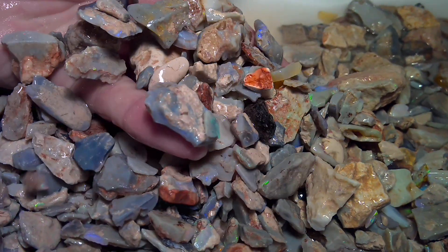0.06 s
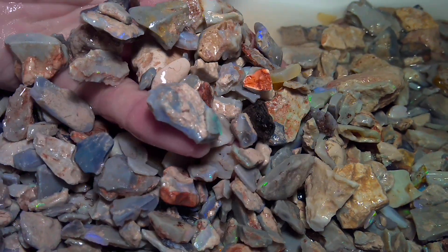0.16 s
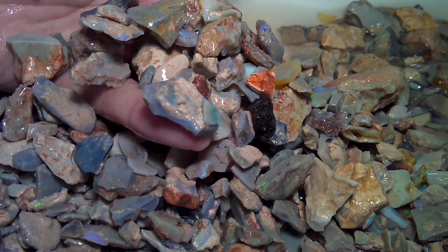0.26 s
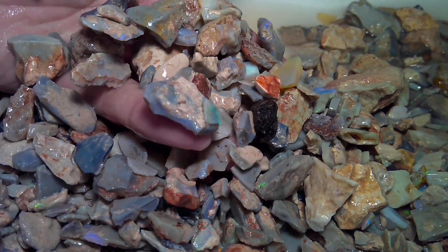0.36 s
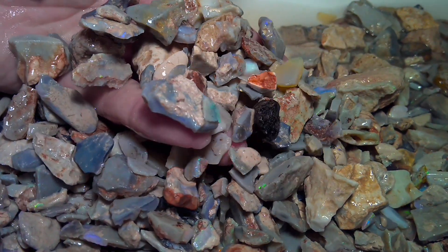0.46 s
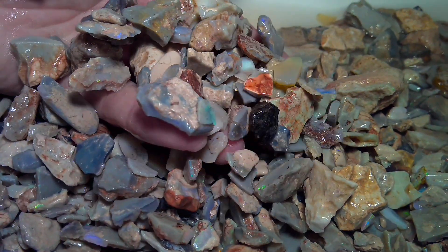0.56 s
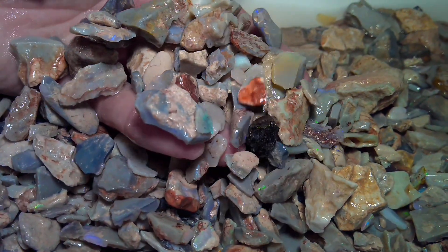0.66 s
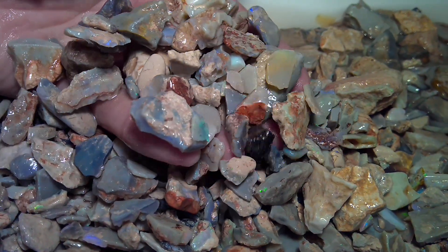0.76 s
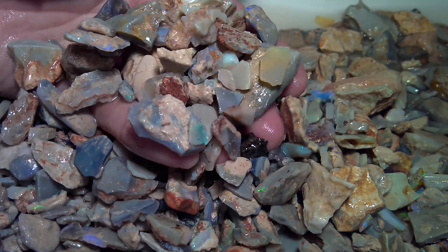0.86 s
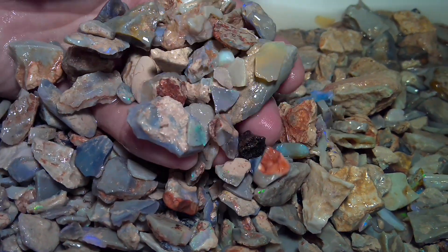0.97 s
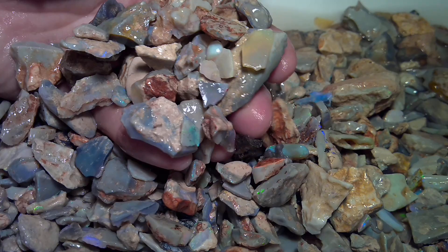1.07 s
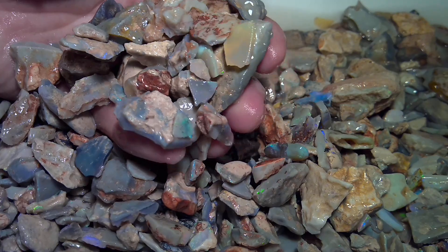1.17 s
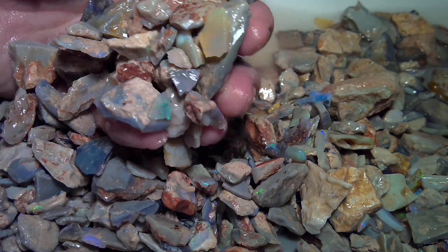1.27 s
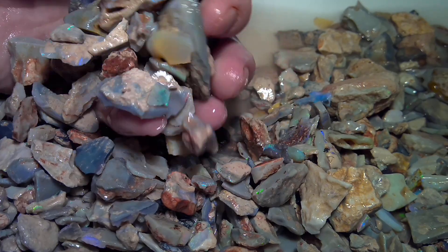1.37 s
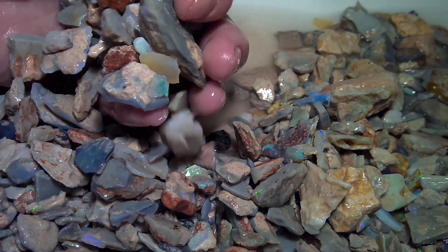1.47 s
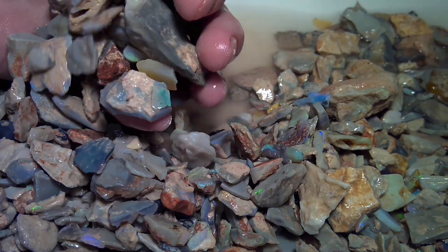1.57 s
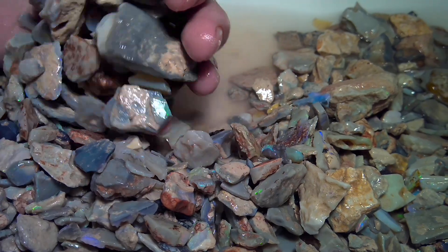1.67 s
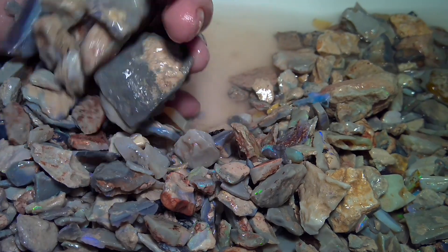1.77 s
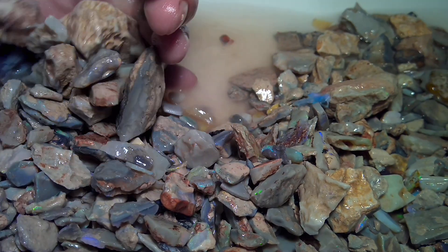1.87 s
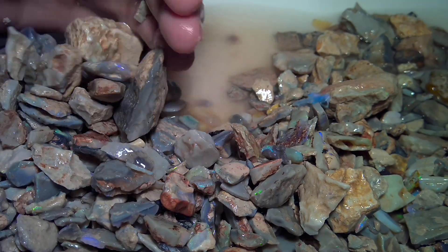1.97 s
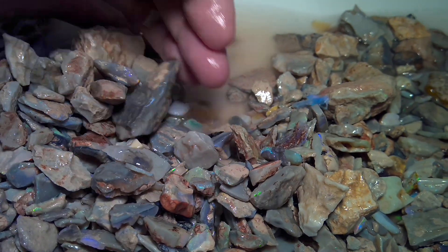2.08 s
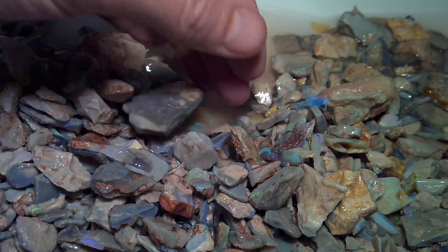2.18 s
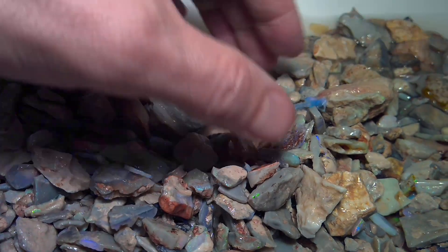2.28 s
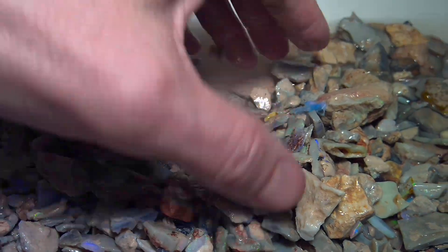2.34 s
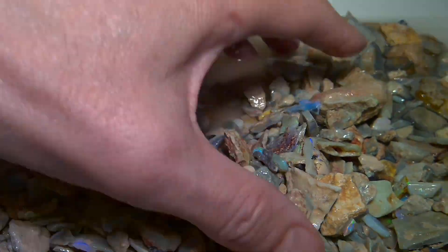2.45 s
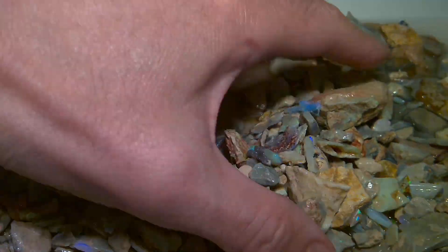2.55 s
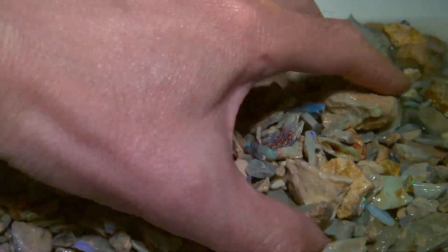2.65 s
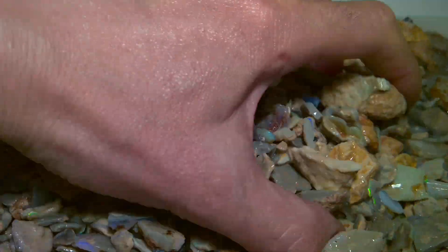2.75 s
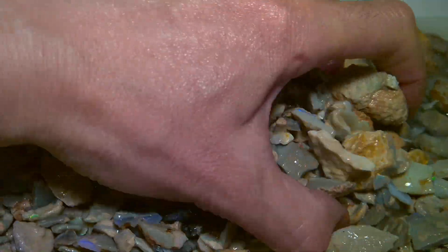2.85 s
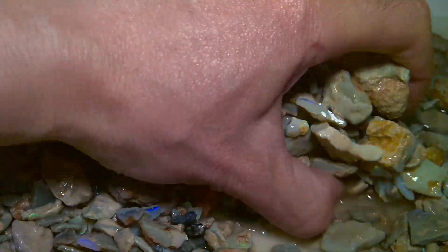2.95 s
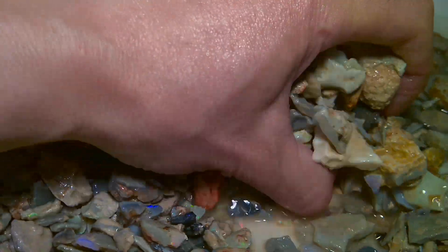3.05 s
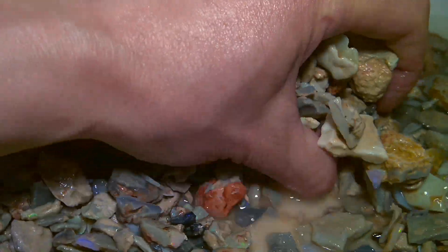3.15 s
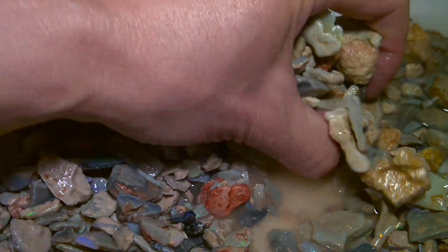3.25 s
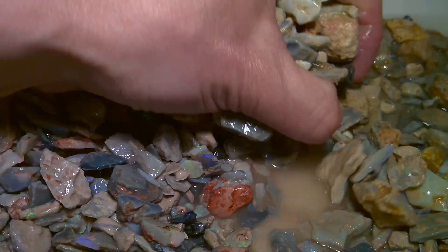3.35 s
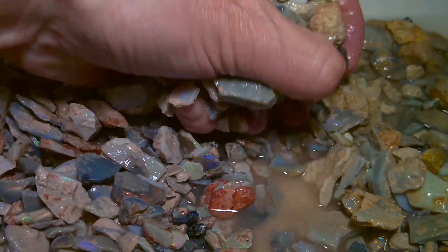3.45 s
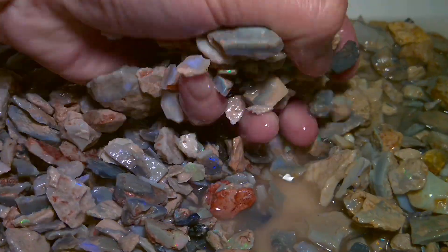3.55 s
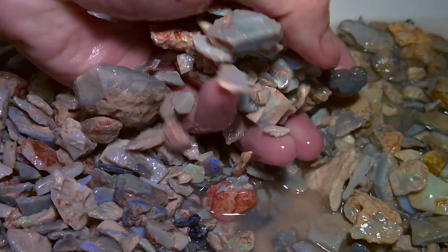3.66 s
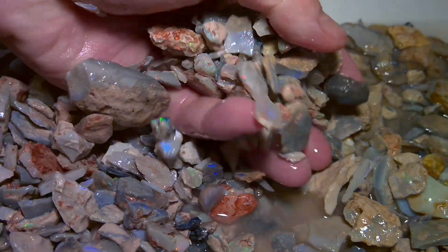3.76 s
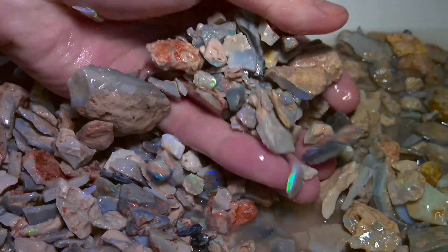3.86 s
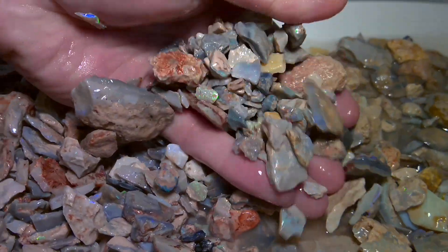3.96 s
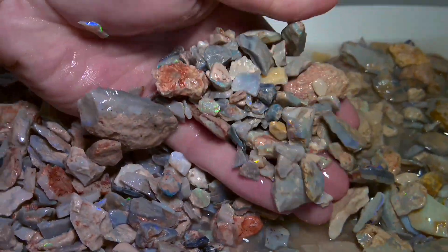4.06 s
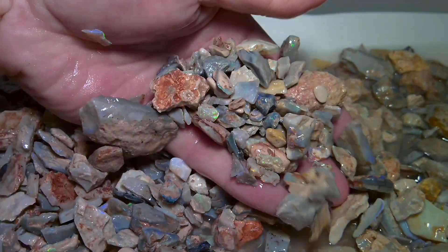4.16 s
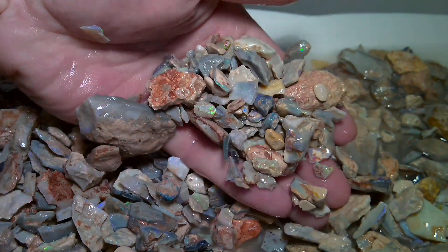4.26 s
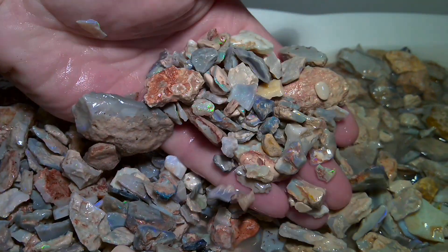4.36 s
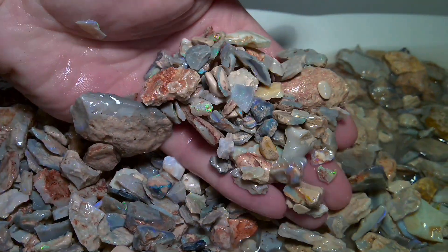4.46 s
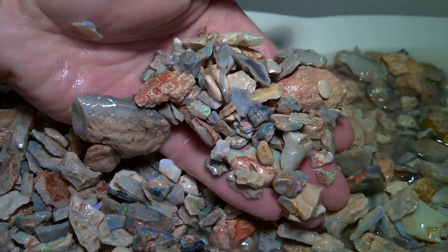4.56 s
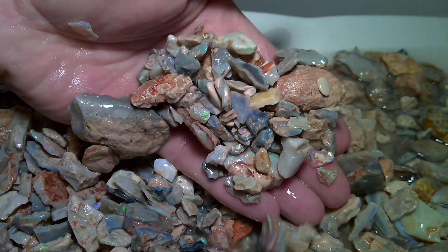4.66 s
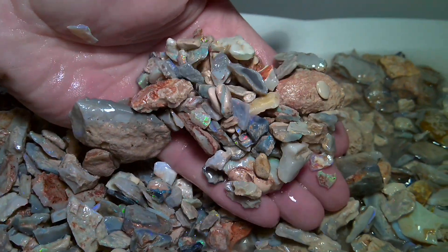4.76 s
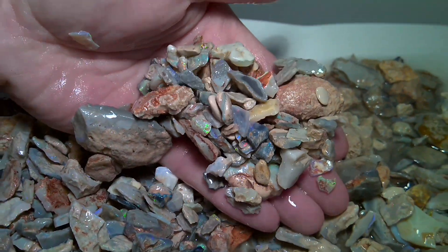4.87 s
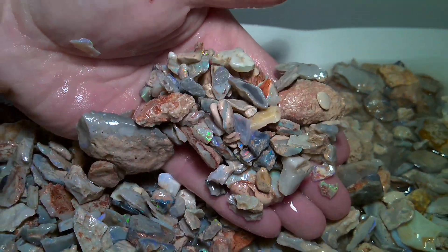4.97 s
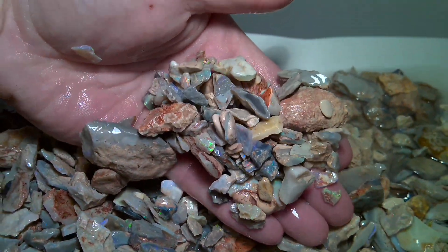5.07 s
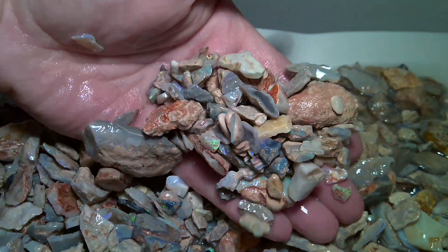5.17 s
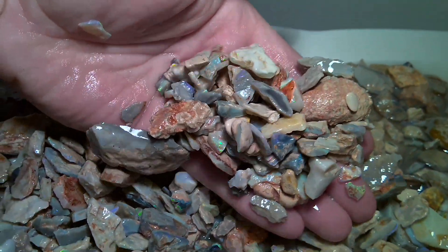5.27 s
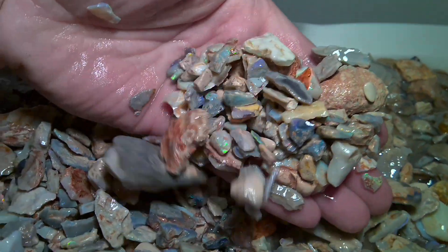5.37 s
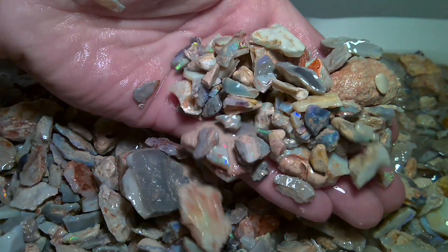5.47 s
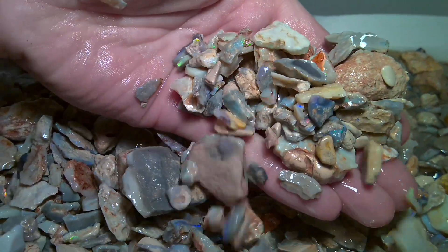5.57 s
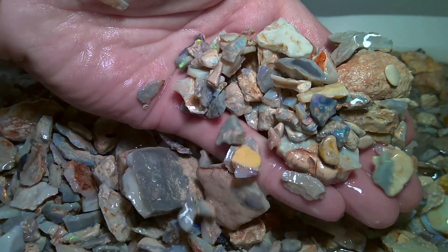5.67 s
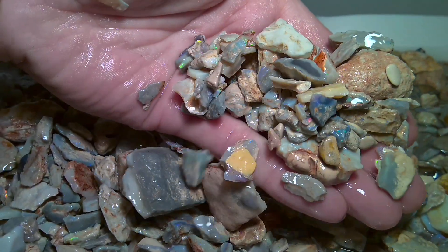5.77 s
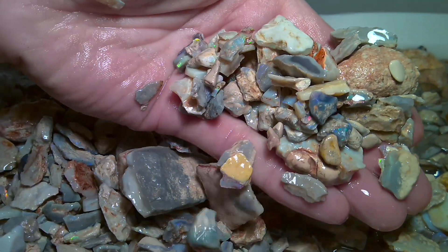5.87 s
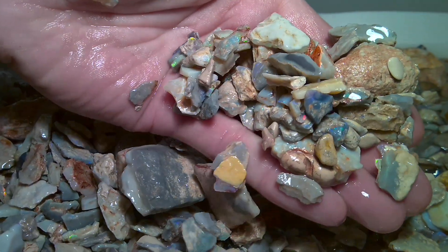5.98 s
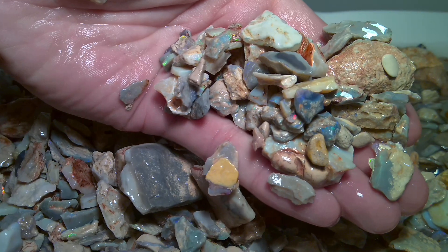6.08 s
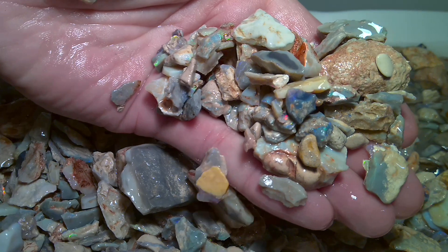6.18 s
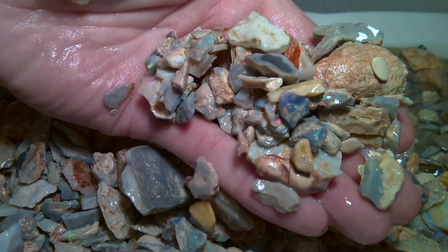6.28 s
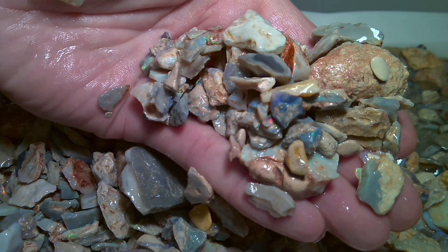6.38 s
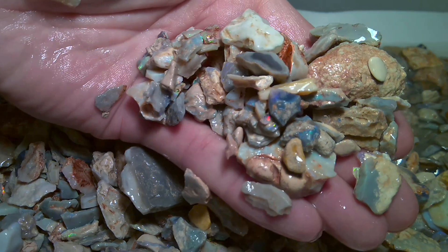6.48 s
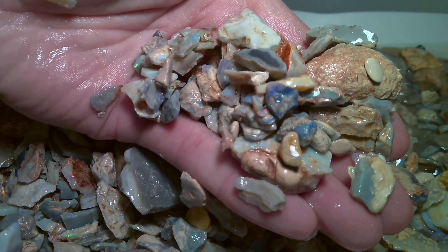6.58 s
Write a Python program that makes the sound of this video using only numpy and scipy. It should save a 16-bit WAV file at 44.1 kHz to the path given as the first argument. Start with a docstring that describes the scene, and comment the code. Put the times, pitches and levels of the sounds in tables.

```python
"""A low hum runs throughout, held down by the recorder's noise suppressor whenever the stones are quiet: a sine
over faint air. A hand scoops small wet stones in a plastic tub and lets them slide back onto the pile, close
to the microphone. The shifting heap is many random contacts, levelled in five bands. Over it single stones
clink and thud as noise bursts through resonances, and large stones ring as decaying sines. The tub rings in
a small room."""
import sys
import numpy as np
from scipy import signal
from scipy.fft import rfft, irfft, next_fast_len
from scipy.io import wavfile
from scipy.ndimage import uniform_filter1d

SR = 44100
rng = np.random.default_rng(int(sys.argv[2]) if len(sys.argv) > 2 else 0)


def output_pcm(signal):
    """Save a mono or channel-first signal as 16-bit PCM at the path in sys.argv[1].

    Samples are clipped to [-1, 1] before scaling.
    """
    pcm = np.clip(np.atleast_2d(signal).T, -1, 1) * 32767
    wavfile.write(sys.argv[1], SR, np.round(pcm).astype(np.int16))


N = 292383


def amp(db):
    """Decibels to gain."""
    return 10 ** (np.asarray(db) / 20)


def rms(x):
    """Root mean square."""
    return np.sqrt(np.mean(x ** 2) + 1e-20)


def read(points, hz):
    """Interpolates a spectrum table on a log-frequency axis."""
    f, value = np.transpose(points)
    return np.interp(np.log(hz + 1), np.log(f), value)


def add(mix, start_s, sound):
    """Mixes a stereo sound in at a time."""
    part = mix[:, max(round(start_s * SR), 0):][:, :sound.shape[1]]
    part += sound[:, :part.shape[1]]


def resonances(hz, modes):
    """Response of ringing modes (centre_hz, width_hz, lift_db) added to the plain sound."""
    return 1 + sum((amp(lift_db) - 1) / (1 + 1j * (hz - centre_hz) / (width_hz / 2))
                   for centre_hz, width_hz, lift_db in modes)


# likeness of the two channels: freq_hz, correlation
CHANNEL_LIKENESS = [(100, 0.95), (700, 1), (1400, 0.8), (2800, 0.18), (5600, 0.27), (15000, 0.26)]
RIGHT_LAG_S = 0.000027


def pair(z, hz):
    """Two unrelated spectra become a stereo pair, alike in the bass, the right one slightly late."""
    same = np.clip(read(CHANNEL_LIKENESS, hz), -.99, .99)
    mid = z[0] * np.sqrt((1 + same) / 2)
    side = z[1] * np.sqrt((1 - same) / 2)
    late = np.exp(-2j * np.pi * hz * RIGHT_LAG_S)
    return np.array([mid + side, (mid - side) * late])


HUM_HZ = 37.89
# background air under the hum: freq_hz, relative_density_db_per_hz
AIR = [(25, 0), (60, 0), (100, -6), (200, -20), (600, -23), (2000, -31), (5000, -39), (16000, -43)]


def hum(hum_db=-38, air_db=-77):
    """A deep, steady sine over a faint wash of shaped noise."""
    t, hz = np.arange(N) / SR, np.fft.rfftfreq(N, 1 / SR)
    tone = np.sqrt(2) * amp(hum_db) * np.sin(2 * np.pi * (HUM_HZ * t + rng.random()))
    noise = rfft(rng.standard_normal((2, N)))
    air = irfft(pair(noise, hz) * amp(read(AIR, hz)), N)
    return tone + air / rms(air) * amp(air_db)


# crossovers between knock, body, clack, tick and fizz: edge_hz
BAND_EDGES_HZ = [700, 2400, 6000, 11000]


def bands(x):
    """Splits a sound into knock, body, clack, tick and fizz."""
    parts = []
    for edge_hz in BAND_EDGES_HZ:
        low, high = (signal.butter(N=7, Wn=edge_hz, btype=kind, fs=SR, output="sos") for kind in ("low", "high"))
        parts.append(signal.sosfilt(low, x))
        x = signal.sosfilt(high, x)
    return parts + [x]


# colour of a contact: freq_hz, gain_db
CONTACT_COLOUR = [(45, -27), (80, -3), (110, 7), (220, -7), (430, -2.5), (750, 0.5), (2000, 2.5), (2600, 2),
                  (4500, 1.5), (6500, 7.5), (10000, 2), (16000, -3)]
# resonances of the tub: centre_hz, width_hz, lift_db over the plain sound
TUB_MODES = [(349.6, 42, 16), (492, 13, 11.5), (605.7, 77, 20.5), (713, 37, 3.5), (885, 110, 7.5),
             (973, 16, 8.5), (1634, 13, 9.5), (1999, 11, 9), (2265, 220, 16)]


def tub(x, size=8192):
    """The tub colours every contact; two microphones hear it alike in the bass, unlike in the treble."""
    padded = next_fast_len(x.shape[1] + size, real=True)
    hz = np.fft.rfftfreq(padded, 1 / SR)
    colour = amp(read(CONTACT_COLOUR, hz)) * resonances(hz, TUB_MODES)
    return irfft(pair(rfft(x, padded), hz) * colour, padded)[:, :x.shape[1]]


# decay of the room: freq_hz, t60_s
ROOM = [(150, .28), (600, .25), (2500, .3), (6000, .22), (15000, .17)]
SNAP_S = .0004  # e-fold time on either side of the snap


def contact(ring_hz, ring_db, scatter_db, snap_db, ring_t60_s=0.03, overtone_db=8, crack_s=0.0036,
            rise_s=0.0022, scatter_t60_s=0.17, room_db=-25, lump_db=5, size=16384, count=6):
    """One stone strikes another: a snap in a gritty crack, quick echoes among the stones, then the room."""
    t, hz = np.arange(size) / SR, np.fft.rfftfreq(size, 1 / SR)
    crack, scatter, room = rng.standard_normal((3, 2, size))
    f, when, z = signal.stft(room, SR, nperseg=256)
    room = signal.istft(z * amp(-60 * when / read(ROOM, f)[:, None]), SR)[1][:, :size]
    scatter = scatter * amp(-60 * t / scatter_t60_s)
    blow = crack * np.exp(-t / crack_s) + scatter * amp(scatter_db) + amp(room_db) * room
    blow = blow * (1 - np.exp(-t / rise_s))
    blow = blow + amp(snap_db) * crack * np.exp(-abs(t - rise_s) / SNAP_S)
    # an irregular stone has unrelated higher rings, and radiates some bands better than others
    overtones = [(mode_hz, mode_hz / 60, overtone_db) for mode_hz in 2400 * 6 ** rng.random(count)]
    colour = resonances(hz, [(ring_hz, 2.2 / ring_t60_s, ring_db)] + overtones)
    for place, lift in rng.random((count, 2)):
        lump_hz = 2000 * 7 ** place
        colour = colour * resonances(hz, [(lump_hz, lump_hz / 7, lump_db * (3 * lift - 2))])
    fade_out = np.minimum(1, 20 * (1 - t / t[-1]))
    return irfft(rfft(blow) * colour) * fade_out


# stone on stone, one value per band: balance_db
STONE_DB = (-8, 1, 0.5, -8, -13.5)
# one value per band: gain_db per dB of hardness
HARDNESS_SHARE = (-0.041, -0.049, 0.33, 1.06, 1.6)


def stone_bands(level_db, hardness_db):
    """Levels of knock, body, clack, tick and fizz: a harder contact is brighter."""
    return np.array([level_db + db + share * hardness_db for db, share in zip(STONE_DB, HARDNESS_SHARE)])


# slides as the hand moves: start_s, peak_s, end_s, level_db (before band balance), hardness_db (at peak),
# bass_weight_db (knock band). The hand lifts and tips, the handful pours out; the fingers dig in and close
# on a new handful, which drains as it rises; they open, stones tumble down the pile and roll to rest.
SLIDES = [(0.0, -0.02, 0.9, -77.5, 1, 7), (0.303, 0.361, 0.32, -70, 5, 4),
          (0.533, 0.85, 1.7, -82.5, 10.5, 11), (0.92, 0.94, 1.226, -62, 4.5, 12),
          (1.313, 1.484, 1.6, -58.5, 11.5, 0), (1.48, 1.583, 3.8, -57.5, 7.5, -6),
          (1.78, 1.855, 2.086, -33, 1, -0.5), (1.76, 1.86, 1.91, -64.5, 28.5, 0),
          (1.937, 2.145, 2.35, -38, -6, -1.5), (2.431, 2.465, 2.474, -37, -2, 4.5),
          (2.543, 2.837, 3.114, -32, -3, 1.5), (2.872, 3.155, 3.29, -31, 2, -1.5),
          (3.33, 3.433, 4.16, -67, 0.5, 3), (3.35, 3.748, 4.72, -73, 8, 5),
          (4.689, 4.745, 4.875, -60, -8, -1.5), (5.219, 5.343, 5.7, -59, 1, 8.5),
          (5.466, 5.485, 5.64, -49, 6.5, 9), (5.711, 5.714, 5.682, -34.5, 5.5, -1.5),
          (5.72, 5.782, 5.886, -47.5, 2.5, 7.5), (5.929, 6.1, 6.2, -88, -14.5, 26)]
# arch: drop_db at start and end, exponent of fullness, hardness gained per dB of effort
SLIDE_DROP_DB, SLIDE_SHAPE, HARDER_WITH_EFFORT = 13, 2.14, 0.31
# rattle of the neighbours after a clink, relative to it
SETTLE_DB, SETTLE_DELAY_S, SETTLE_DB_PER_S = -26, 0.04, 208.5
REST_DB = -100  # heap at rest, per band


def unrest(count=3300):
    """Band levels of the moving heap (dB): an arch for each slide, a short dying rattle after each clink."""
    t = np.linspace(0, N / SR, count)
    power = np.full((len(STONE_DB), count), amp(REST_DB) ** 2)
    for start_s, peak_s, end_s, level_db, hardness_db, bass_weight_db in SLIDES:
        before_peak = (peak_s - t) / max(peak_s - start_s, t[1])
        after_peak = (t - peak_s) / max(end_s - peak_s, t[1])
        effort_db = -SLIDE_DROP_DB * np.maximum(before_peak, after_peak) ** SLIDE_SHAPE
        levels_db = stone_bands(level_db + effort_db, hardness_db + HARDER_WITH_EFFORT * effort_db)
        levels_db[0] += bass_weight_db
        power += amp(levels_db) ** 2
    for start_s, level_db, hardness_db, *_ in CLINKS:
        since_s = t - start_s - SETTLE_DELAY_S
        settle_db = level_db + SETTLE_DB - SETTLE_DB_PER_S * abs(since_s)
        power += (since_s > 0) * amp(stone_bands(settle_db, hardness_db)) ** 2
    return [np.interp(np.arange(N) / SR, t, 10 * np.log10(band)) for band in power]


# drone of the tub floor under the heap: centre_hz, width_hz, lift_db over the plain sound
TUB_FLOOR = [(930, 120, 5), (955, 100, -1.5)]
# dB of contact rate per dB of clack level; scale of the random strength in dB
THINNING, SPREAD_DB = .33, 3


def heap(top_rate_hz=720, count=32):
    """Many small stones jostle; the harder the hand digs, the more contacts there are each second."""
    t = np.arange(N) / SR
    levels_db = unrest()
    stones = [contact(ring_hz, ring_db=19, scatter_db=-15, snap_db=-9, overtone_db=11, crack_s=0.0014,
                      rise_s=.0006, size=8192)
              for ring_hz in np.geomspace(900, 12000, count)]
    clack_db = levels_db[2]
    rate_hz = top_rate_hz * amp(THINNING * (clack_db - clack_db.max()))
    strength = amp(SPREAD_DB * np.minimum(rng.exponential(1, N), 4))
    pick = rng.integers(0, count, N)
    smallness = rng.uniform(.8, 1.2, N)
    rattle = np.zeros((2, N))
    for i in np.flatnonzero(rng.random(N) < rate_hz / SR):
        # stones differ in size: a smaller one rings higher and shorter
        stone = stones[pick[i]]
        at = np.arange(stone.shape[1])
        sized = np.array([np.interp(at * smallness[i], at, side) for side in stone])
        add(rattle, t[i], strength[i] * sized / rms(sized))
    rattle = irfft(rfft(rattle) * resonances(np.fft.rfftfreq(N, 1 / SR), TUB_FLOOR), N)
    out = np.zeros((2, N))
    for part, level_db in zip(bands(tub(rattle)), levels_db):
        # flatten each band, then impose its level
        power = uniform_filter1d((part ** 2).mean(0), size=4000)
        out += part / np.sqrt(abs(power) + power.mean() / 1000) * amp(level_db)
    return out


# snap against the crack; dB gained per dB that tick exceeds body
SNAP_DB, SNAP_SHARE = -5.5, .13


def strike(levels_db, ring_hz, ring_db, size=900):
    """One contact in the tub, with its five bands at the given levels; a brighter one snaps more sharply."""
    snap_db = SNAP_DB + SNAP_SHARE * (levels_db[3] - levels_db[1])
    parts = bands(tub(contact(ring_hz, ring_db, scatter_db=-12.5, snap_db=snap_db)))
    return sum(part / rms(part[:, :size]) * amp(db) for part, db in zip(parts, levels_db))


# stone strikes stone: start_s, level_db (before band balance), hardness_db, ring_hz, ring_lift_db
CLINKS = [(0.0662, -77, 24, 7900, 19.5), (0.0838, -80, 23, 8630, 20), (0.113, -85, 19, 11900, 16),
          (0.36, -66, 0.5, 960, 16), (0.861, -68, 4, 3500, 22), (0.944, -50.5, -55, 1060, 17.5),
          (0.958, -63, -34, 880, 18), (1.013, -63, -27, 820, 25), (1.047, -61.5, 18, 5200, 35),
          (1.22, -62.5, -20, 2260, 15), (1.273, -67.5, -1, 3390, 19), (1.36, -55, -25, 2360, 5),
          (1.4, -59.5, 5, 4400, 18), (1.425, -56, 9, 4670, 31), (1.451, -59.5, 17, 6270, 4),
          (1.552, -51, 8, 5100, 20), (1.569, -50.5, 15.5, 4670, 18), (1.578, -41.5, -4.5, 970, 11.5),
          (1.599, -50, -25, 2180, 17), (1.6453, -46.5, 8.5, 2240, -1), (1.676, -51, -20, 2140, 6),
          (1.737, -32.5, -8, 1810, 10), (1.748, -33.5, 0.5, 4580, 20), (1.808, -33.5, 5, 944, 11),
          (1.856, -38, 6, 2080, -4), (1.875, -35.5, 3, 923, 15), (1.908, -41.5, 10.5, 3120, 8),
          (2.133, -32, 0, 4420, 13), (2.193, -37.5, -4, 4330, 16), (2.212, -32.5, -20, 3200, 19),
          (2.29, -33.5, -7, 4460, 10.5), (2.334, -37, -6, 1300, 8), (2.36, -38, -6, 2770, 16),
          (2.446, -42, -0.5, 4420, 12), (2.475, -43.5, -0.5, 4360, 24), (2.535, -39.5, -10, 565, 20.5),
          (2.57, -38.5, -9, 2010, 9), (2.7016, -42, -1, 930, 6), (2.995, -29.5, 1, 4100, 13),
          (3.02, -32, 4, 970, 13), (3.143, -35, 4, 2630, 7), (3.199, -35, 3.5, 2680, 32),
          (3.208, -39.5, 4, 4200, 20), (3.31, -45, 5.5, 856, 13), (3.3905, -62.5, 17, 13800, 21),
          (3.402, -52.5, -30, 982, 29), (3.442, -58.5, -30, 930, 17), (3.478, -53.5, -28, 927, 20),
          (3.979, -46, -15, 1690, 25), (4.268, -61, 6, 1660, 13), (4.2951, -45.5, 14, 12400, 16),
          (4.7572, -34.5, -2, 1694, 8.5), (4.774, -48, 2.5, 3180, 37), (5.275, -47.5, -4.5, 4370, 5),
          (5.312, -41.5, 1.5, 3320, 14), (5.38, -53, 10.5, 1250, 10), (5.455, -65, 19, 5700, 14),
          (5.467, -50.5, 10, 4700, 21), (5.486, -37, 1.5, 4560, 8), (5.499, -47, 3, 4400, 12),
          (5.562, -38.5, 1.5, 2170, 5), (5.601, -43, 7.5, 5430, 24), (5.67, -41.5, 4, 2350, 9),
          (5.6884, -29, 1, 3780, 15), (5.703, -32.5, 3, 3960, 9), (5.851, -46, 5.5, 3000, 6)]


def clinks():
    """Single stones strike each other, each with its own hardness and ring."""
    out = np.zeros((2, N))
    for start_s, level_db, hardness_db, ring_hz, ring_db in CLINKS:
        add(out, start_s, strike(stone_bands(level_db, hardness_db), ring_hz, ring_db))
    return out


# a stone drops dully on the wet pile: start_s, level_db (before band balance), smack_db, pitch_hz
THUDS = [(1.048, -51.5, -4, 465), (1.305, -57, -21, 445), (1.484, -51, 8, 402), (1.994, -37, 4, 302),
         (3.978, -44.5, -22, 538), (5.563, -38, -3, 535), (5.603, -47.5, 0.5, 328), (5.91, -52.5, 5.5, 354),
         (5.963, -47, 5.5, 398), (5.999, -49, 5.5, 385), (6.027, -51, -4.5, 584), (6.137, -51, -20, 366),
         (6.177, -54.5, -33, 338), (6.3759, -52.5, 7, 427)]
# thud, one value per band: balance_db
THUD_DB = (-1, -16, -17, -10.5, -11.5)
# one value per band: gain_db per dB of wet smack
SMACK_SHARE = (-0.001, .4, 0.549, 1, 1.2)


def thuds(ring_db=15):
    """Single stones land on the wet pile with a low knock and a wet smack."""
    out = np.zeros((2, N))
    for start_s, level_db, smack_db, pitch_hz in THUDS:
        levels_db = level_db + np.array(THUD_DB) + smack_db * np.array(SMACK_SHARE)
        add(out, start_s, strike(levels_db, pitch_hz, ring_db))
    return out


# blows that set a large stone ringing: start_s, level_db, echo_db, stone
LARGE_BLOWS = [(2.2128, -25.5, -2, "lump"), (2.291, -28.5, -3, "lump"), (3.98, -42, -5, "slab"),
               (4.02, -55.5, -6, "slab"), (4.297, -37, -5, "flake"), (4.757, -40, -1, "cobble"),
               (5.6895, -29, 1, "block")]
# modes of each large stone, by name: mode_hz, relative_level_db, t60_s
LARGE_STONES = { "lump": [(610, -7, .028), (880, 0, .022), (1020, -4, .022), (1250, -3, .03),
                (1660, -6, .035), (1950, -12, .03)], "slab": [(958, -12, .1), (1625, -3, .14),
                (1690, 2, .03)], "flake": [(1130, -1, .04), (1615, 3, .06), (2245, -9, .07),
                (2650, -1, .05), (3400, -7, .04), (4170, -6, .05), (4540, -8, .05)],
                "cobble": [(1521, 0, .06), (1660, 2, .07), (1935, 0, .07), (2196, -3, .11), (2780, -9, .16),
                (3261, -1, .1), (3345, -2, .13), (3700, -3, .12), (4043, -8, .09)],
                "block": [(1674, -9, .15), (2143, -7, .18), (2262, 0, .14), (2799, -3, .09),
                (3098, -4, .18), (3305, 0, .12), (3700, -4, .05), (3844, -1, .13), (4930, -8, .08)]}


def large_stones(echo_t60_s=0.19, size=12000, count=900):
    """A blow starts all the modes of a large stone at once; they ring on, blurred by echoes in the tub."""
    t, hz = np.arange(size) / SR, np.fft.rfftfreq(size, 1 / SR)
    out = np.zeros((2, N))
    for start_s, level_db, echo_db, stone in LARGE_BLOWS:
        ring = sum(amp(db) * np.exp(-np.log(1000) * t / t60_s) * np.sin(2 * np.pi * mode_hz * t) * (-1) ** k
                   for k, (mode_hz, db, t60_s) in enumerate(LARGE_STONES[stone]))
        noise = rfft(rng.standard_normal((2, size)))
        echoes = irfft(pair(noise, hz)) * np.exp(-np.log(1000) * t / echo_t60_s)
        blur = signal.fftconvolve(ring[None], echoes / np.linalg.norm(echoes[0]))[:, :size]
        ring = ring + amp(echo_db) * blur
        add(out, start_s, amp(level_db) * ring / rms(ring[:, :count]))
    return out


def scene():
    """Stones a touch to the right, over the hum."""
    stones = heap() + clinks() + thuds() + large_stones()
    return stones * amp([[-.4], [.4]]) + hum()


def suppressor(x, listen_hz=(90, 420), threshold_db=-77, slope=.85, depth_db=19.5, lag_s=0.036, bass_hz=58,
               size=440):
    """Turns the deep bass down while the band just above it is quiet, and lets it up with a short lag."""
    heard = x.mean(0) * np.minimum(1, np.arange(N) / SR / .15) ** 2  # detector fades in over 0.15 s
    key = signal.sosfilt(signal.butter(N=8, Wn=listen_hz, btype="band", fs=SR, output="sos"), heard)
    key_db = 10 * np.log10(abs(uniform_filter1d(key ** 2, size)) + 1e-14)
    keep = np.exp(-1 / (lag_s * SR))
    target_db = np.clip((key_db - threshold_db) * slope, 0, depth_db)
    open_db = signal.lfilter([1 - keep], [1, -keep], target_db)
    bass = signal.sosfiltfilt(signal.butter(N=8, Wn=bass_hz, fs=SR, output="sos"), x, padlen=SR // 4)
    return x - bass + bass * amp(open_db - depth_db)


def record(dry):
    """The recorder's noise suppressor, then its band limit."""
    band_limit = signal.firwin(511, 16150, window=("kaiser", 9), fs=SR)
    return signal.oaconvolve(suppressor(dry), band_limit[None], "same")


dry = scene()
out = record(dry)
output_pcm(out)
```